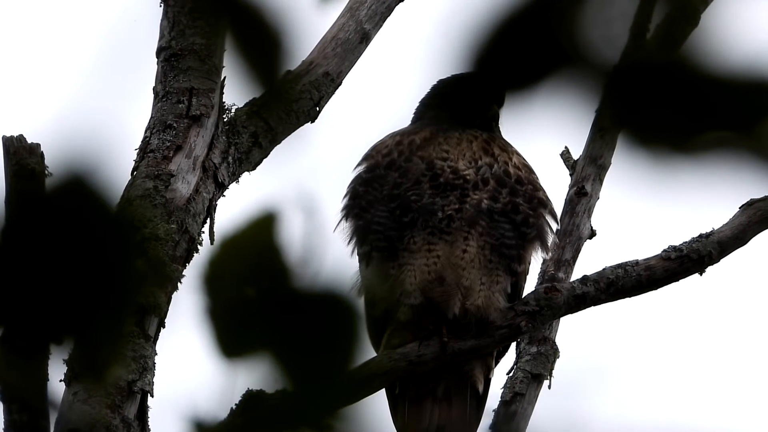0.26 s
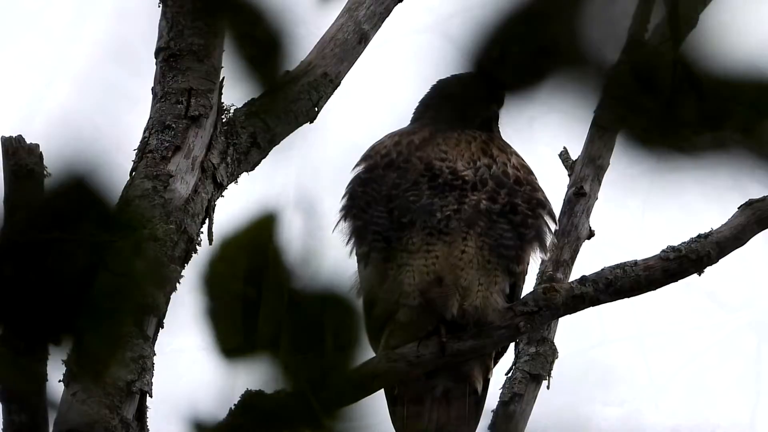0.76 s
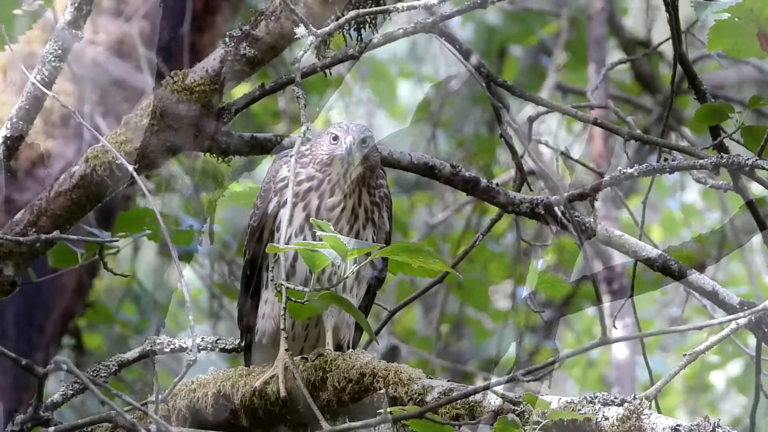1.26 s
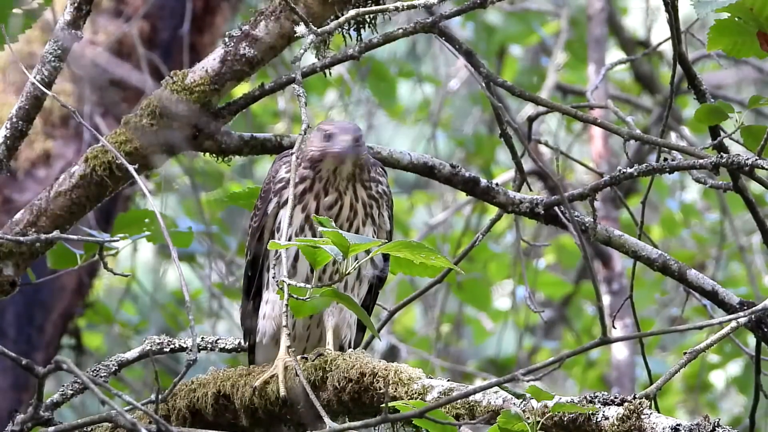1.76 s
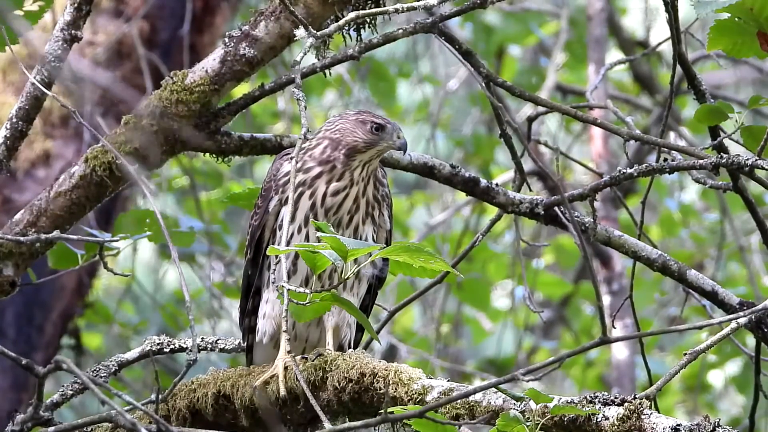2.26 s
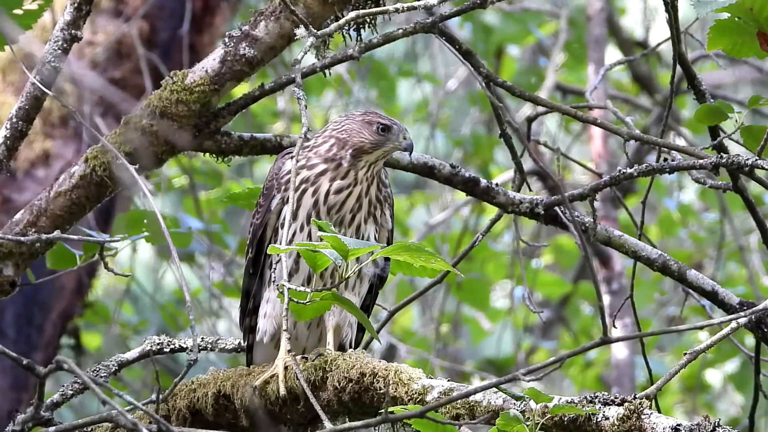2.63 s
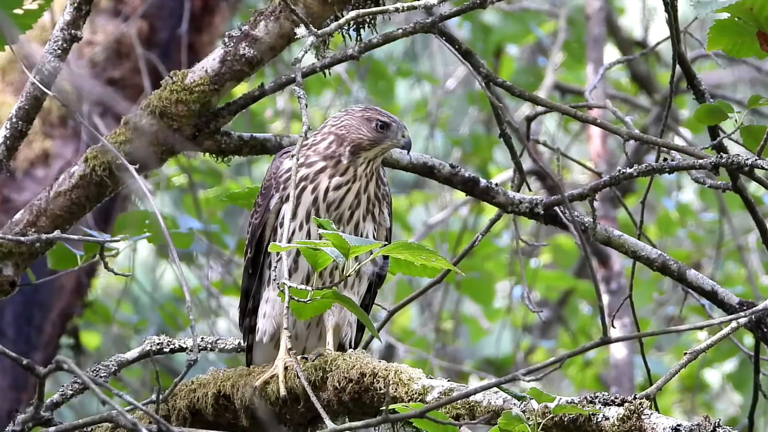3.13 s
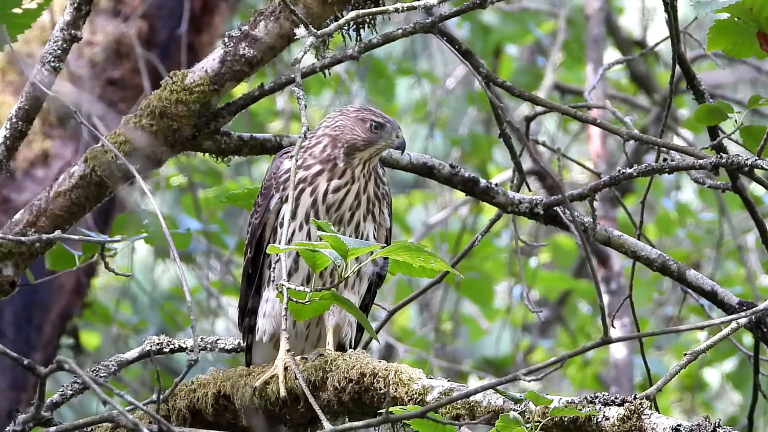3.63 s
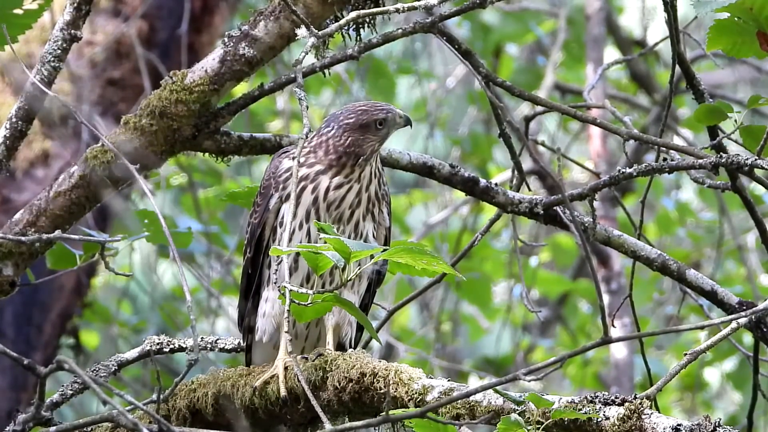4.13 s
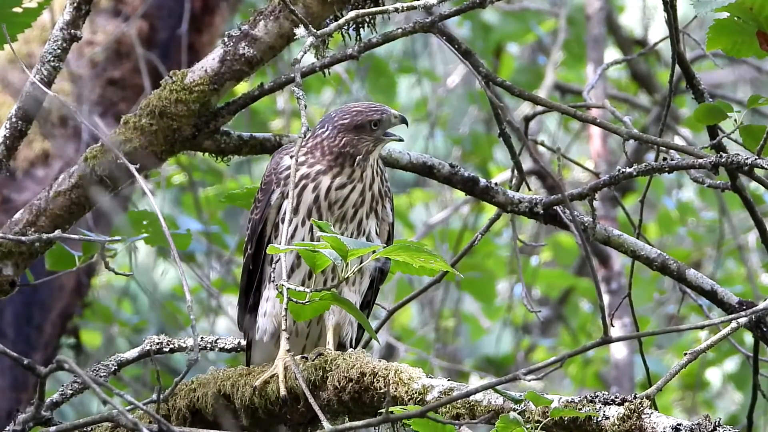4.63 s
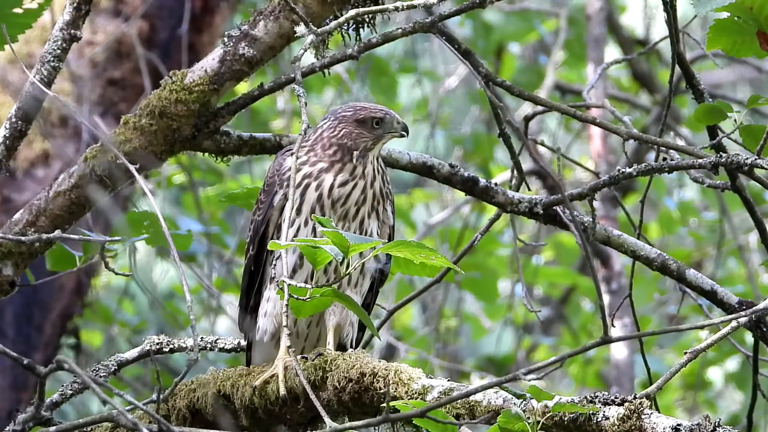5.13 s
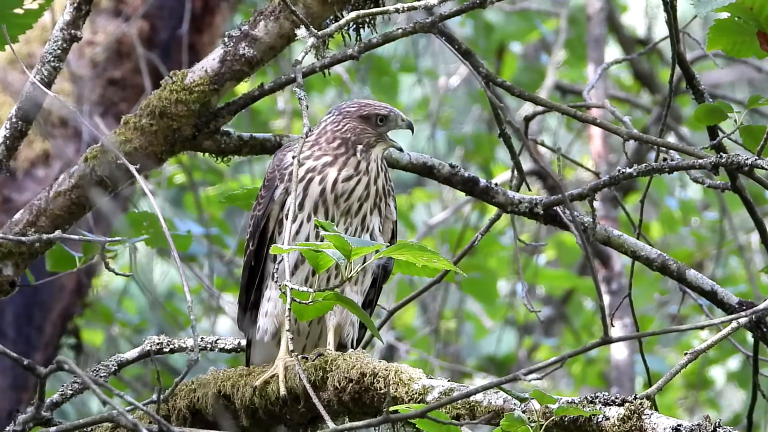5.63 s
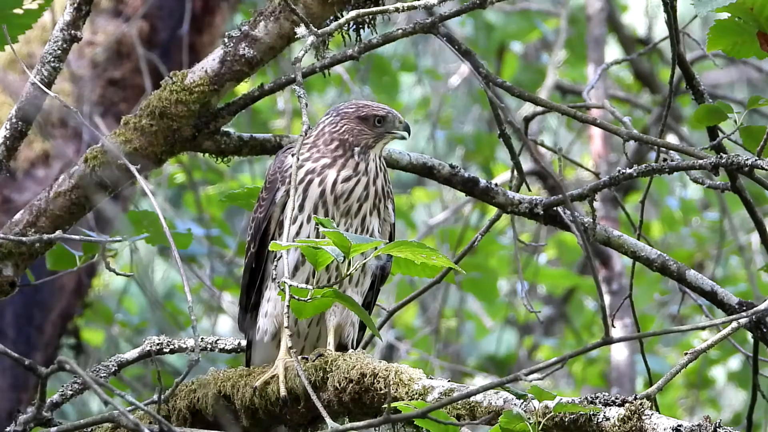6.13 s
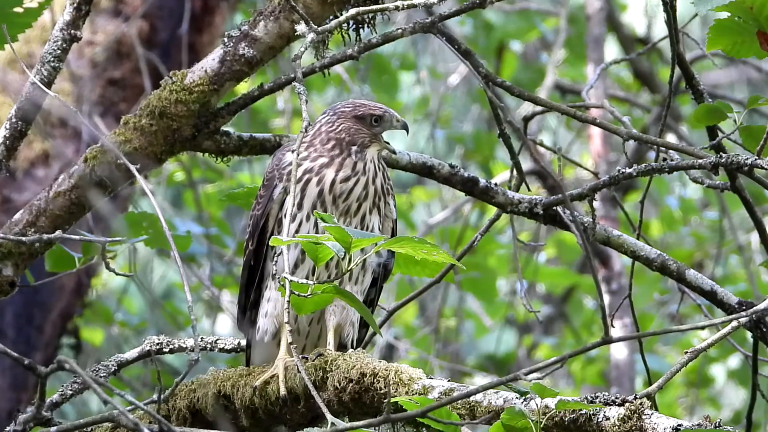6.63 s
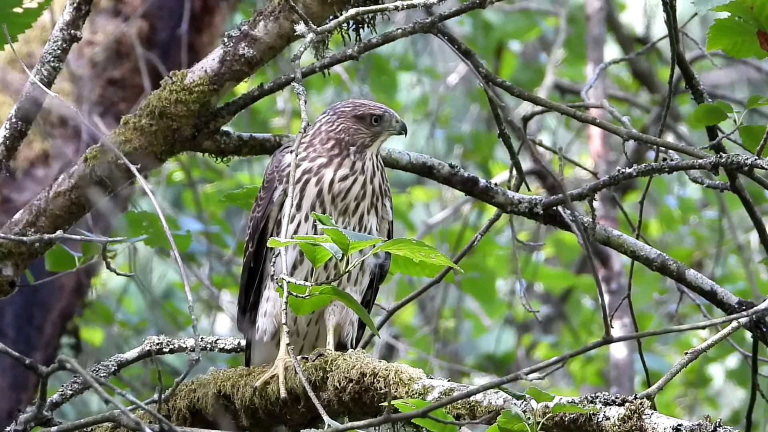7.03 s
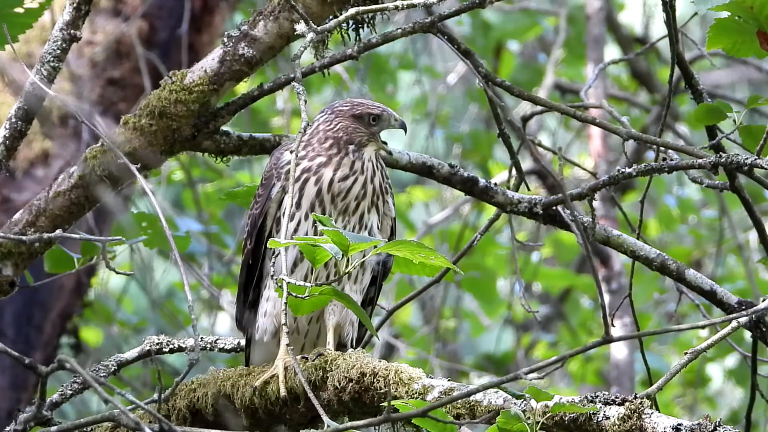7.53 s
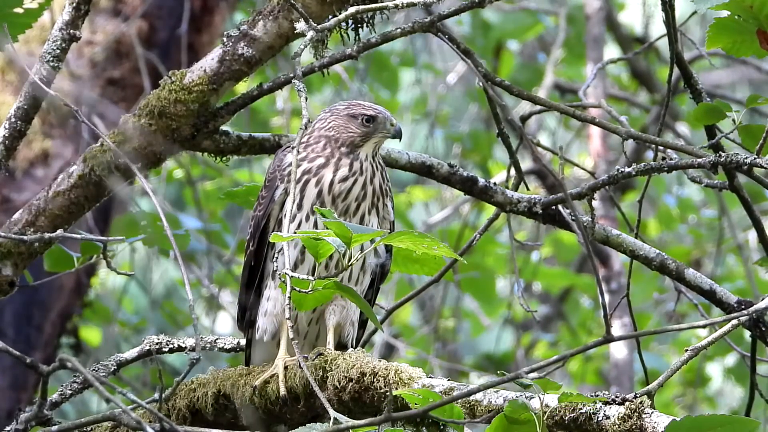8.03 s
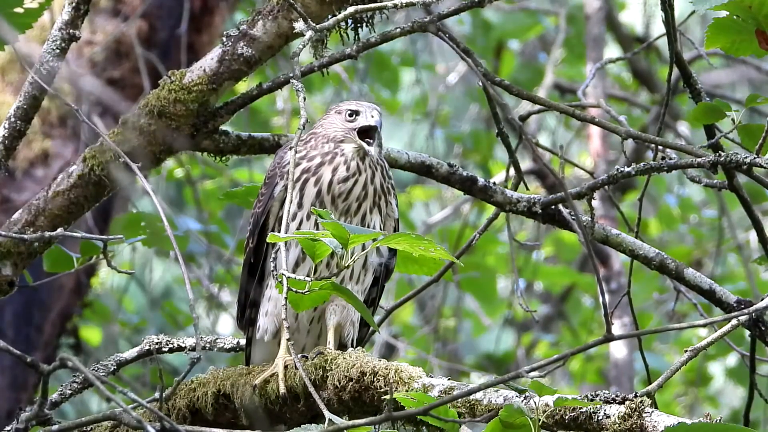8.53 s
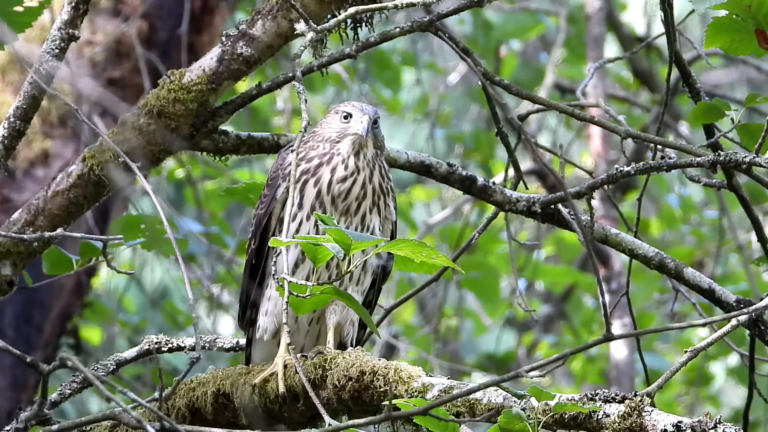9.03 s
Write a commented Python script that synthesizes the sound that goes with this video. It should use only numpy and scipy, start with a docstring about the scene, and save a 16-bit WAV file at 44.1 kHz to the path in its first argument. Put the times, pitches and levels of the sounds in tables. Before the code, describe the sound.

Quiet woodland opens with faint thin songbird notes, low wind bumps on the microphone and a soft distant road roar. Midway a young hawk some metres away starts calling: five shrill descending whistles about a second apart, the first weaker and lower, the later ones higher, louder and hoarser. Each begins with a quick rising raspy chirp, and trunks scatter a short thin echo. A far engine drone creeps in late.

```python
"""A young hawk in a wood gives five falling whistles with a two-voiced syrinx, some metres off.
Each call opens on a rising low voice, then jumps to a high whistle; sum and difference tones mix the two.
Trunks scatter the calls and a few faint songbird notes, built as smeared gliding sines.
Behind, coloured noise makes wind on the microphone, distant road, wide air that fades out early and hiss;
a far engine drone of four unsteady sines sets in late."""
import sys
import numpy as np
from scipy import signal
from scipy.fft import rfft, irfft, next_fast_len
from scipy.io import wavfile
from scipy.ndimage import uniform_filter1d

SR = 44100
rng = np.random.default_rng(int(sys.argv[2]) if len(sys.argv) > 2 else 0)


def waveform_to_disk(signal):
    """Save audio, clipped to [-1, 1], as 16-bit WAV at the path in sys.argv[1]."""
    frames = np.transpose(np.atleast_2d(signal))
    scaled = np.clip(frames, -1, 1) * 32767
    samples = np.round(scaled).astype(np.int16)
    wavfile.write(sys.argv[1], SR, samples)


N = 409248
TIME = np.arange(N) / SR

# Whistle pitch, one table a call. Each row: time in seconds, pitch in Hz.
WHISTLE = [
    [(4.522, 3159), (4.55, 3131), (4.608, 2987), (4.669, 2948), (4.715, 2743), (4.81, 2590)],
    [(5.474, 3620), (5.492, 3826), (5.501, 4048), (5.515, 4040), (5.527, 3720), (5.549, 3540),
     (5.765, 3228), (5.865, 2980), (5.905, 2710)],
    [(6.461, 3596), (6.473, 3839), (6.483, 4230), (6.505, 4292), (6.601, 4141), (6.628, 4020),
     (6.641, 3710), (6.699, 3544), (6.822, 3385), (6.884, 3133), (6.914, 2862)],
    [(7.447, 4240), (7.545, 4300), (7.603, 4215), (7.619, 4076), (7.649, 4037), (7.663, 3830),
     (7.754, 3734), (7.842, 3415), (7.89, 3370), (7.932, 3198), (7.95, 2916)],
    [(8.465, 4100), (8.477, 4375), (8.527, 4310), (8.6, 4250), (8.618, 4105), (8.65, 4100), (8.685, 3920),
     (8.75, 3641), (8.836, 3549), (8.93, 3230), (8.955, 2920)],
]
# Throat resonance. Each row: frequency in Hz, gain in dB.
THROAT = [(1500, -14), (2300, -8), (3000, 3), (3600, 8), (4400, 0), (5400, -3), (6100, -26), (8200, -22),
          (9000, -34), (13000, -40)]
# Breath noise colour. Each row: frequency in Hz, relative density in dB per Hz.
BREATH = [(800, -28.5), (1600, -19), (2400, -19.5), (3100, -19), (3650, 0), (4400, -5.5), (5400, -13.5),
          (6200, -23.5), (9000, -31.5), (13000, -39), (16000, -76)]
# Start and end, in seconds, of the fade from wide air to the stronger road roar.
CROSSFADE_S = (0.75, 1.6)
# A whistle above this pitch stifles the low voice and holds its pitch.
CHOKE_HZ, CHOKE_DB_PER_KHZ = 3628, 79


def undb(db):
    """Amplitude ratio of a dB value."""
    return 10 ** (np.asarray(db) / 20)


def level(x, rms_db):
    """Scale a signal to an RMS level."""
    return x * undb(rms_db) / np.sqrt(np.mean(x ** 2))


def shape_db(points, hz):
    """Read a (Hz, dB) spectrum at hz, interpolating over log frequency."""
    f, db = np.transpose(points)
    return np.interp(np.log(np.maximum(hz, 1)), np.log(f), db)


def curve(points):
    """Read (seconds, value) points over the whole time axis."""
    return np.interp(TIME, *np.transpose(points))


def phase(hz):
    """Integrate a pitch into phase in radians."""
    return 2 * np.pi * np.cumsum(hz) / SR


def noise(points, rms_db, size=N):
    """Gaussian noise filtered to the colour of a spectrum."""
    n = next_fast_len(size)
    bins_hz = np.arange(n // 2 + 1) * SR / n
    spectrum = rfft(rng.standard_normal(n)) * undb(shape_db(points, bins_hz))
    return level(irfft(spectrum, n)[:size], rms_db)


def walk(rate_hz):
    """Smooth chance of RMS 1 that changes about rate_hz times a second."""
    k = max(int(SR / rate_hz), 1)
    smooth = uniform_filter1d(uniform_filter1d(rng.standard_normal(N), k), k)
    return level(smooth, 0)


def track(tables, edge_s):
    """Columns of all tables over time, and a soft gate that is open inside them."""
    s, *columns = np.transpose(np.concatenate(tables))
    inside = sum((TIME >= t[0][0]) & (TIME <= t[-1][0]) for t in tables)
    gate = uniform_filter1d(1. * np.clip(inside, 0, 1), int(edge_s * SR))
    return [np.interp(TIME, s, c) for c in columns], gate


def hoarse(rough):
    """Gain of a weak tone that comes and goes and is smeared by turbulence."""
    return undb(2.0 * walk(32)) * (1 - rough + rough * walk(340))


def hawk():
    """Two membranes vibrate at once; their sum and difference tones and the breath pass the throat."""
    # Whistle effort, one table a call. Each row: time in seconds, RMS level in dB.
    effort = [
        [(4.52, -30.5), (4.58, -36.5), (4.668, -29), (4.706, -38), (4.735, -37), (4.81, -51)],
        [(5.474, -21.5), (5.53, -24), (5.58, -19), (5.65, -27), (5.694, -31.5), (5.744, -21.5), (5.82, -33),
         (5.88, -34), (5.905, -49.5)],
        [(6.461, -23.5), (6.526, -24.5), (6.595, -27), (6.635, -22.5), (6.67, -23.5), (6.724, -19.5),
         (6.82, -22), (6.835, -30.5), (6.875, -24), (6.914, -41.5)],
        [(7.447, -27.5), (7.55, -27), (7.635, -30.5), (7.667, -20), (7.78, -23.5), (7.83, -19.5), (7.9, -26.5),
         (7.931, -24), (7.95, -46)],
        [(8.465, -27), (8.56, -26), (8.7, -25.5), (8.714, -18.5), (8.765, -28), (8.835, -19.5), (8.9, -28),
         (8.93, -26.5), (8.955, -45.5)],
    ]
    wobble_share = .007
    twelfth_db = -18  # third partial re octave
    air_db = -1.5  # breath re rasp level

    high_hz = curve(np.concatenate(WHISTLE))
    (high_db,), high_on = track(effort, edge_s=0.0028)
    low_hz, low_db, over_db, rasp_db, octave_db, gate = low_voice(high_hz)
    low_on = uniform_filter1d(gate, int(.01 * SR))

    # near the top of its range the whistle turns hoarse and shakes the low voice out of tune
    strain = np.clip((high_hz - 3300) / 900, 0, 1) * high_on
    flutter = .1 + .2 * strain
    high = phase(high_hz * (1 + .03 * flutter * walk(300) + wobble_share * strain * walk(70)))
    low = phase(low_hz * (1 + (.006 + .04 * np.sqrt(strain)) * walk(200)))

    stack = low_stack(low, low_hz, over_db)
    octave = hoarse(.45) * np.sin(2 * high)
    twelfth = undb(twelfth_db) * hoarse(.55) * np.sin(3 * high)
    upper = undb(octave_db) * (octave + twelfth)
    mixed = mixing_tones(high, low, high_hz, low_db, strain)
    rasp = rasp_tones(high, low, high_hz, low_hz)
    breath = undb(air_db + 4.5 * strain + 2.0 * walk(60)) * noise(BREATH, -3)
    # under strain the tone breaks into short beads
    beads = undb(2.0 * strain * walk(110)) * (1 + flutter * walk(500))

    whistle = undb(high_db) * (beads * np.sin(high) + upper)
    whistle += low_on * mixed + undb(rasp_db) * (low_on * rasp + breath)
    return np.sqrt(2) * (undb(low_db) * low_on * stack + high_on * whistle)


def low_voice(high_hz):
    """Pitch, level, overtones, rasp, octave and gate of each call: a quick rise, then a faint sagging tone."""
    # One row a call. Each row: low voice start, top, give-way and stop in seconds, top and last pitch in Hz,
    # opening, held and initial rasp level in dB, octave in dB re whistle.
    calls = [(4.477, 4.535, 4.52, 4.73, 1392, 1321, -37.5, -47.5, -40.5, -17.5),
             (5.432, 5.484, 5.478, 5.87, 1632, 1341, -36, -49, -37.5, -20),
             (6.425, 6.455, 6.483, 6.87, 1617, 1474, -35, -48, -38, -17.5),
             (7.4, 7.443, 7.455, 7.93, 1642, 1546, -34.5, -50.5, -37.5, -19.5),
             (8.418, 8.456, 8.467, 8.92, 1632, 1527, -33, -45, -35.5, -13.5)]
    # Each row: whistle pitch in Hz, change of the octave in dB.
    octave_change = [(2700, 3), (3100, -1), (3500, -16), (4300, -18)]
    opening_share, opening_swell_db = .61, 13  # first pitch re top pitch; swell up to the top
    give_way_s = 0.0046
    stop_fade_s, stop_fade_db = 0.048, 10
    opening_over_db, top_over_db, held_over_db = 5, -1, -3.5  # overtones re low voice
    rasp_fade_db = 10.5  # over a whistle

    choke_khz = np.maximum(high_hz - CHOKE_HZ, 0) / 1000
    patchy_db = 3 * walk(30)  # the held tone comes and goes
    out = np.zeros((6, N))
    for call, whistle in zip(calls, WHISTLE):
        start, top, give, stop, top_hz, last_hz, open_db, held_db, rasp_db, octave_db = call
        jump, end = whistle[0][0], whistle[-1][0]
        held = np.clip((TIME - give) / give_way_s, 0, 1)
        rise = np.clip((TIME - start) / (top - start), 0, 1)

        # the pitch sags only while the whistle does not choke it
        free = np.cumsum((choke_khz == 0) & (TIME > give) & (TIME < stop))
        hz = top_hz * (opening_share + (1 - opening_share) * rise)
        hz += (last_hz - top_hz) * free / free[-1]

        fade_db = stop_fade_db * np.clip(1 + (TIME - stop) / stop_fade_s, 0, 1)
        opening_db = open_db - opening_swell_db * (1 - rise)
        faint_db = held_db - CHOKE_DB_PER_KHZ * choke_khz - fade_db + patchy_db
        db = (1 - held) * opening_db + held * faint_db

        rising_over_db = opening_over_db + rise ** 2 * (top_over_db - opening_over_db)
        over_db = (1 - held) * rising_over_db + held * held_over_db
        tiring_db = rasp_db - rasp_fade_db * np.clip((TIME - jump) / (end - jump), 0, 1)
        octave = octave_db + shape_db(octave_change, high_hz)
        gate = (TIME >= start) & (TIME <= stop)
        out = np.where(TIME >= start - .1, [hz, db, over_db, tiring_db, octave, gate], out)
    return out


def low_stack(low, low_hz, over_db):
    """The low membrane's fundamental, with overtones shaped by the throat and breath noise."""
    # Each row: multiple of the low voice, level in dB before the throat.
    partials = [(2, 0.0), (3, 2.0), (4, -7.0), (5, -6.0), (6, -12.0), (7, -12.0)]
    overtones = sum(undb(db + shape_db(THROAT, k * low_hz)) * np.sin(k * low) for k, db in partials)
    return np.sin(low) + undb(over_db) * ((1 + .4 * walk(700)) * overtones + noise(BREATH, -6))


def mixing_tones(high, low, high_hz, low_db, strain):
    """Sum and difference tones follow the low voice up to a ceiling that strain lowers."""
    # Each row: multiple of high, multiple of low, level in dB re the common mix level.
    tones = [(1, 1, 6.5), (1, -1, -9.5), (1, 2, -17), (2, 1, -31), (1, 3, -28), (2, 2, -22)]
    mix_db, swell_db_per_khz, ceiling_db = 1.5, 7.5, -44  # mix_db re low voice
    # the mix swells as the whistle sinks below the choking pitch
    sunk_khz = np.clip((CHOKE_HZ - high_hz) / 1000, 0, .5)
    common_db = np.minimum(low_db + mix_db + swell_db_per_khz * sunk_khz, ceiling_db - 20 * strain)
    return undb(common_db) * sum(undb(db) * hoarse(.15) * np.sin(m * high + n * low) for m, n, db in tones)


def rasp_tones(high, low, high_hz, low_hz):
    """Close-spaced mixing tones, shaped by the throat, make the rasp."""
    # Each row: multiple of high, multiple of low, level in dB re rasp before the throat.
    tones = [(2, -2, -8), (2, -1, -2), (3, -4, -12), (2, -3, -9.5), (0, 2, -37), (0, 3, -12), (-1, 5, -19)]
    out = np.zeros(N)
    for m, n, db in tones:
        throat_db = shape_db(THROAT, abs(m * high_hz + n * low_hz))
        out += undb(db + throat_db) * hoarse(.5) * np.sin(m * high + n * low)
    return out


def wood(x):
    """Near branches give a quick scatter, far trunks a long thin tail: decaying noise convolved with x."""
    t = TIME[:int(1.5 * SR)]
    tails = np.zeros(len(t))
    # T60 in s, energy in dB re direct sound, rise in s
    for t60_s, db, rise_s in ((.18, -10, .003), (0.83, -15, .03)):
        decay = undb(-60 * t / t60_s) * np.minimum(t / rise_s, 1)
        tails += level(rng.standard_normal(len(t)) * decay, db) / np.sqrt(len(t))
    return x + signal.fftconvolve(x, tails)[:N]


def songbirds():
    """Thin gliding notes, smeared in pitch and level by the way through the leaves."""
    # Each row: start and length in seconds, first and last pitch in Hz, smear in Hz, starting level in dB.
    notes = [(0.005, 0.13, 3060, 3070, 60, -63), (0.0, .07, 4000, 3980, 40, -70),
             (0.01, .04, 2180, 2270, 40, -60), (0.075, 0.055, 2280, 2290, 40, -53),
             (0.17, 0.094, 2273, 2340, 39.6, -63), (0.332, 0.2, 3380, 3370, 58.5, -63.5),
             (0.44, 0.56, 4300, 4200, 50.4, -73), (0.84, 0.27, 3410, 3410, 59.7, -61),
             (1.067, 0.37, 3320, 3320, 61, -65), (1.596, 0.29, 7560, 7500, 152, -68.5),
             (3.012, 0.18, 7750, 7600, 149, -68.5), (3.165, 0.086, 7450, 7500, 80, -63),
             (4.844, 0.024, 2130, 2100, 29.7, -51), (5.316, 0.16, 4300, 3644, 61.14, -63.5)]
    out = np.zeros(N)
    for start, length, from_hz, to_hz, smear_hz, db in notes:
        u = np.clip((TIME - start) / length, 0, 1)
        hz = from_hz + (to_hz - from_hz) * u + smear_hz * walk(350)
        swell = np.sin(np.pi * u) ** .25 * undb(db - 4 * u + 2.5 * walk(45))
        out += swell * np.sqrt(2) * np.sin(phase(hz))
    return out


def wind():
    """Gusts rumble on the microphone as low noise; one knocks it, a short sine burst."""
    # Each row: time in seconds, mean level in dB.
    gusts = [(0.0, -52.5), (0.41, -46), (0.77, -49), (1.5, -43), (2.4, -52), (3.07, -42.5), (3.25, -41.5),
             (3.41, -53), (3.85, -47), (4.0, -62), (4.22, -61), (4.38, -41.5), (4.6, -50.5), (5.37, -56),
             (6.6, -55.5), (7.7, -57), (8.5, -70), (9.28, -67)]
    # Each row: frequency in Hz, relative density in dB per Hz.
    colour = [(12, -58), (20, -21), (49, -5), (79, -4.5), (128, -10.5), (200, -19.5), (260, -28),
              (440, -120)]
    # Each row: start of the sine's phase in seconds, envelope peak in dB, pitch in Hz.
    knocks = [(2.209, -33.5, 64.6)]
    out = noise(colour, 0) * undb(curve(gusts) + 0.6 * walk(14))
    for s, db, hz in knocks:
        envelope = undb(db) * np.exp(-((TIME - s - .01) / 0.014) ** 2)
        out += envelope * np.sin(2 * np.pi * hz * (TIME - s))
    return out


def road():
    """Far tyre roar and low rumble, both slowly wavering coloured noise."""
    # Each row: frequency in Hz, relative density in dB per Hz.
    roar_colour = [(240, -21), (400, 1), (423, -2), (525, -4.5), (904, 0.5), (1870, -19.5), (2400, -33),
                   (3600, -23), (6000, -27), (7800, -38), (13200, -120)]
    # Each row: frequency in Hz, relative density in dB per Hz.
    rumble_colour = [(59, -53), (100, -8.5), (189, -10), (227, -6), (308, -9), (341, -7.5), (450, -27),
                     (580, -32.5), (990, -120)]
    # Each row: time in seconds, mean level in dB.
    rumble_level = [(0.0, -53.5), (0.9, -52.5), (7.0, -51.5), (9.28, -52.5)]
    base_db, added_db, swell_db_per_s = -59.5, -48.5, 0.19
    # doubled dB gives power
    power = undb(2 * base_db) + crossfade() * undb(2 * (added_db + swell_db_per_s * TIME))
    roar = noise(roar_colour, 0) * undb(0.72 * walk(6.3)) * np.sqrt(power)
    rumble = noise(rumble_colour, 0) * undb(curve(rumble_level) + 1.8 * walk(5.9))
    return roar + rumble


def engine_drone():
    """A far engine: sines unsteady in pitch and level, each fading in at its own time."""
    # Each row: pitch in Hz, mean level in dB, onset in seconds.
    tones = [(118.8, -55, 6.4), (164.6, -59.5, 6.6), (305, -55, 7.96), (347, -60, 7.5)]
    rise_s = 0.62
    out = np.zeros(N)
    for hz, db, s in tones:
        gain = undb(db + 2.16 * walk(4.2)) * np.clip((TIME - s) / rise_s, 0, 1)
        out += gain * np.sin(phase(hz + 3.24 * walk(16.0)))
    return np.sqrt(2) * out


def crossfade():
    """Ramp from 0 (wide air) to 1 (added road roar)."""
    return np.interp(TIME, CROSSFADE_S, (0, 1))


def wide_air():
    """Coloured noise for opposite signs left and right, fading out early."""
    # Each row: frequency in Hz, relative density in dB per Hz.
    colour = [(18, -35), (30, -5), (66, -12), (120, -9), (360, -6.5), (675, -11), (769, -11.5),
              (15600, -17)]
    return noise(colour, -59) * (1 - crossfade())


def scene():
    """Stereo sum: all sources in the middle, the air wide."""
    mid = wood(hawk() + songbirds()) + wind() + road() + engine_drone()
    wide = wide_air()
    return np.array([mid + wide, mid - wide])


def record(dry):
    """The recorder adds its hiss and cuts the top with a steep low-pass."""
    # Each row: frequency in Hz, relative density in dB per Hz.
    hiss_colour = [(880, -11.5), (1500, -4.5), (2150, -6.5), (3550, -8.5), (3990, -13.5), (5300, -15),
                   (15600, -15.5)]
    hiss_db, top_hz = -57.5, 15740  # hiss level before the cut
    low_pass = signal.ellip(14, .2, 80, top_hz, fs=SR, output="sos")
    return signal.sosfilt(low_pass, dry + noise(hiss_colour, hiss_db))


dry = scene()
out = record(dry)
waveform_to_disk(out)
```